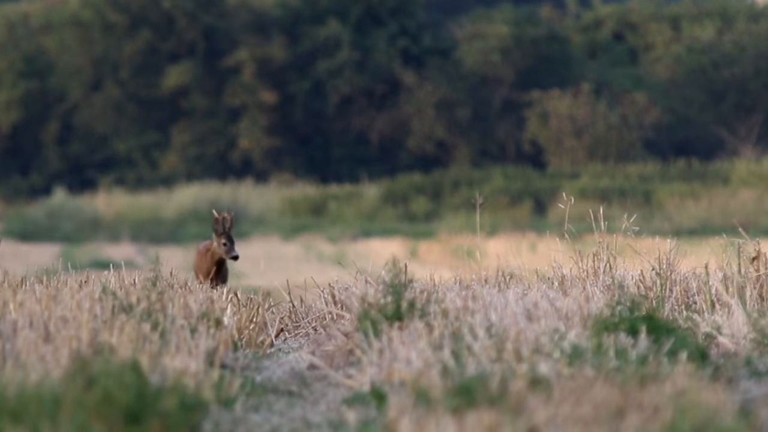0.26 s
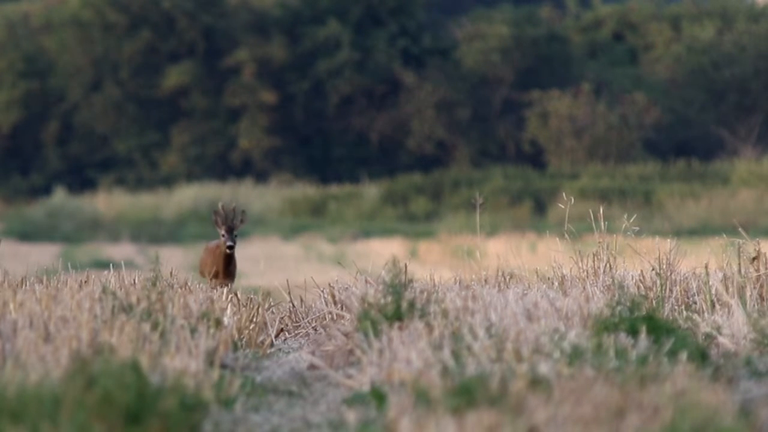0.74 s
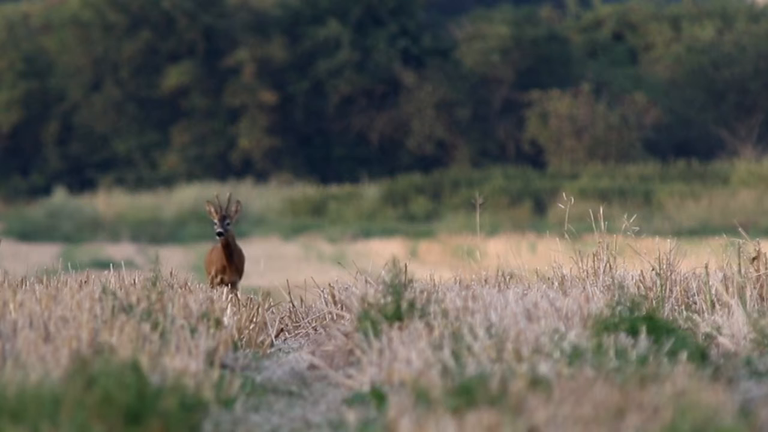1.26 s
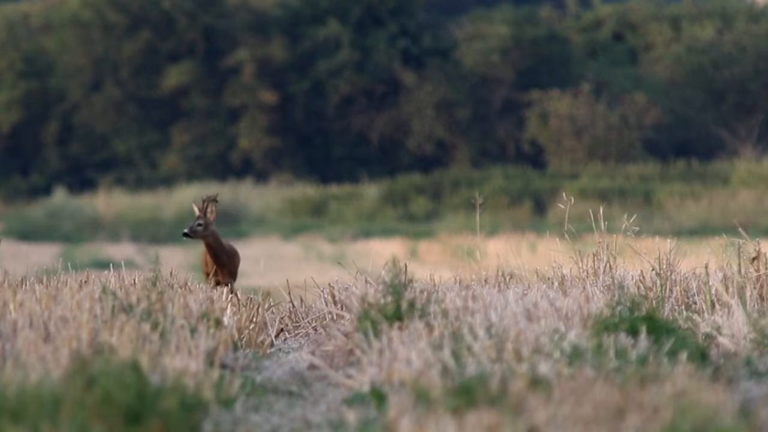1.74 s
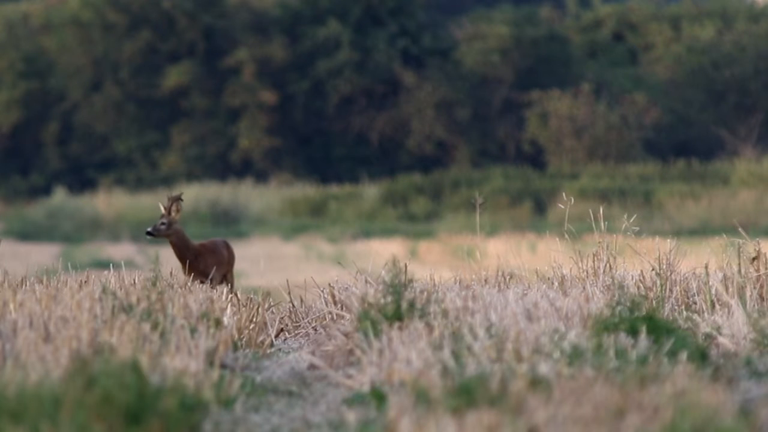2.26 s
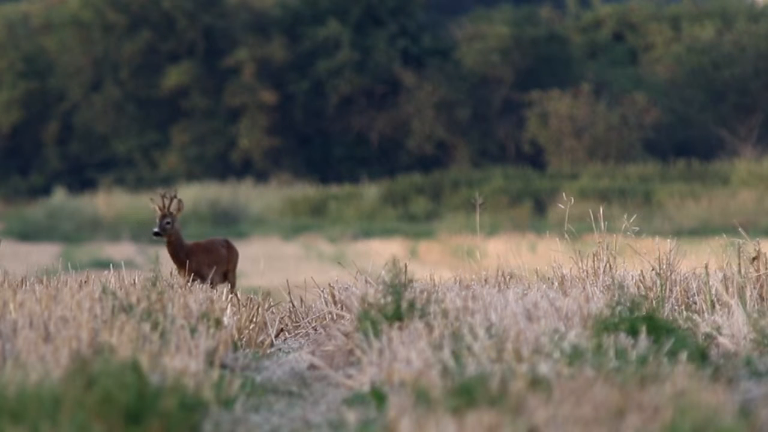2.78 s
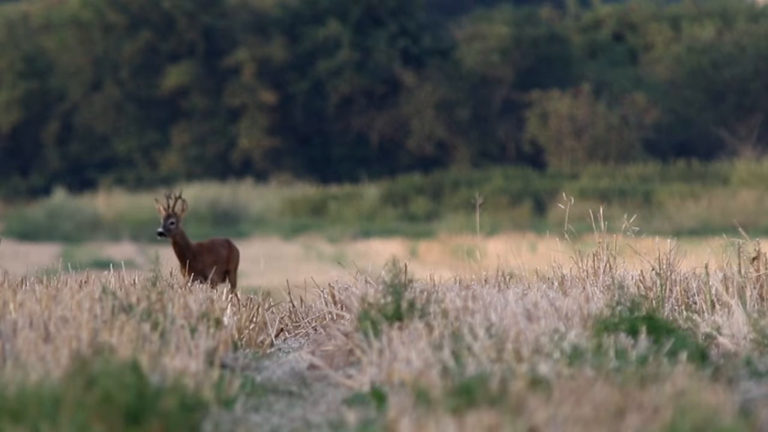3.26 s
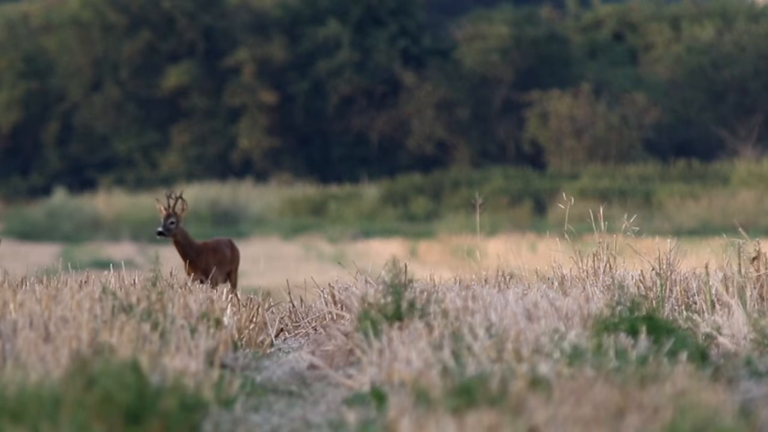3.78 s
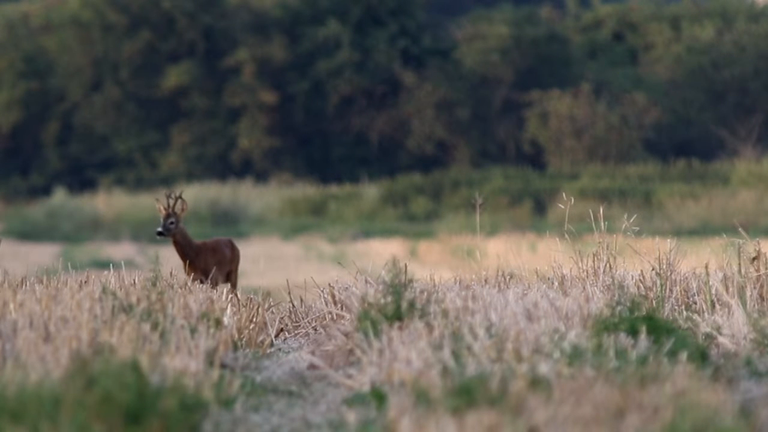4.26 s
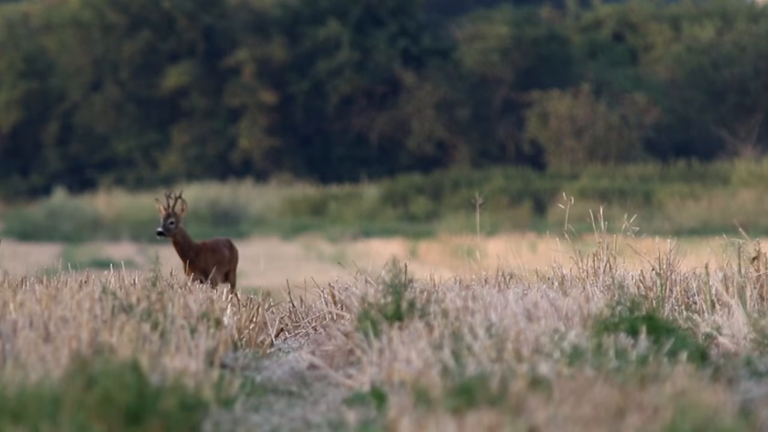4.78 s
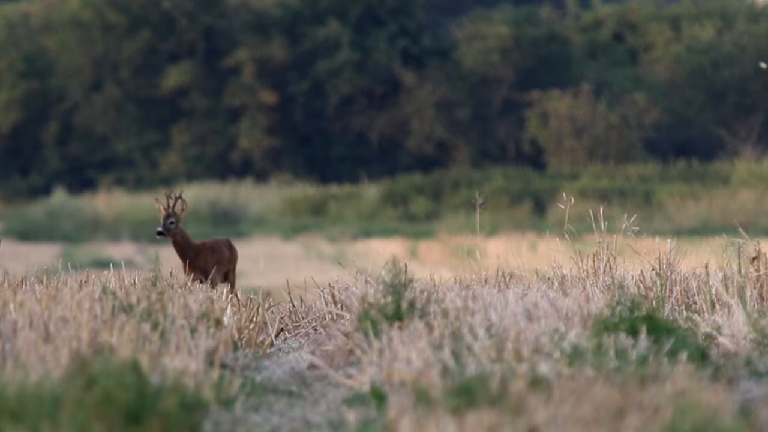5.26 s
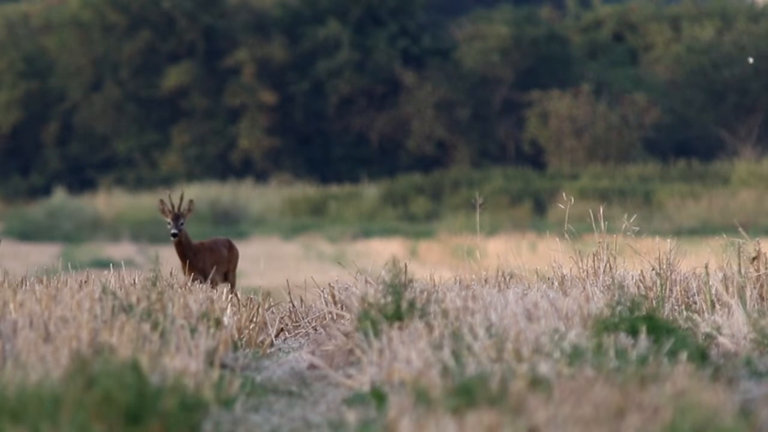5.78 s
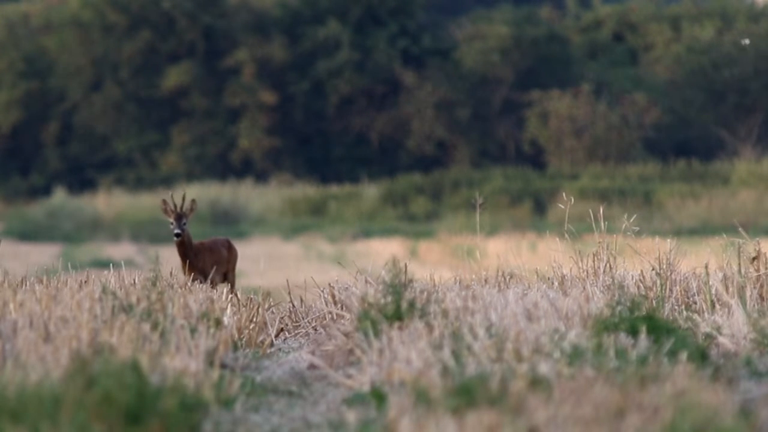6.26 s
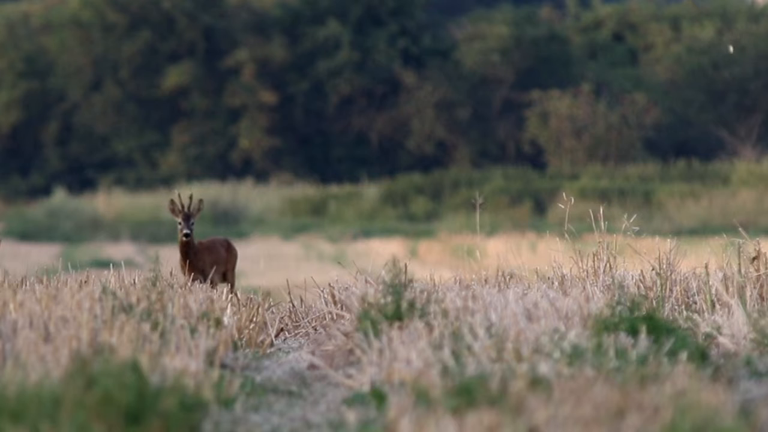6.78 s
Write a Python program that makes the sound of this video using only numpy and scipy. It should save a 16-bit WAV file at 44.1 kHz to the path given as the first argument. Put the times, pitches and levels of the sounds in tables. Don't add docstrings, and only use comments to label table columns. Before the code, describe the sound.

A quiet open field in summer, heard through a camera microphone with low distant hum, airy rustle and light hiss. A tiny handling tick comes at 0.27 s. Faint, dry grasshopper rasps repeat about six times a second, growing slightly until 1.8 s. At 1.84 s a deer gives a single loud, piercing, reedy squeak around 1.5 kHz with bright overtones; it snaps on, rises slightly, sinks and dies by 2.05 s, leaving a short scattered echo from grass and trees. The background drops under automatic gain and creeps back over the next second. From about 2.3 s a faint, low fly buzz wavers in and out, with barely audible lisps and bird notes. Rasping returns from 3.2 to 5.9 s, then again from 6.1 s to the end at 7 s. At 6.6 s a sharp plastic rattle-click knocks the camera body.

```python
import sys
import numpy as np
from scipy import signal
from scipy.fft import rfft, irfft, next_fast_len
from scipy.io import wavfile
from scipy.ndimage import uniform_filter1d, map_coordinates

SR = 44100
rng = np.random.default_rng(int(sys.argv[2]) if len(sys.argv) > 2 else 0)


def int16_out(signal):
    q = np.round(np.clip(np.atleast_2d(signal).T, -1, 1) * 32767)
    wavfile.write(sys.argv[1], SR, q.astype(np.int16))


def makeup_ratio(level_db):
    decades = np.asarray(level_db, float) / 20
    return 10 ** decades


N = 309582


def unit(x):
    return x / np.sqrt(np.mean(x ** 2) + 1e-20)


def along(points, hz):
    f, v = np.transpose(points)
    return np.interp(np.log(hz + 1), np.log(f + 1), v)


def curves(rows, t):
    s, *columns = np.transpose(rows)
    return [np.interp(t, s, column) for column in columns]


def wobble(rate, count=N):
    knots = rng.standard_normal(int(count * rate / SR) + 4)
    return map_coordinates(knots, [np.arange(count) * rate / SR])


def filtered(x, response):
    m = next_fast_len(len(x) + 8192)
    return irfft(rfft(x, m) * response(np.fft.rfftfreq(m, 1 / SR)), m)[:len(x)]


def resonances(modes):
    def response(f):
        total = 0
        for k, (centre, width, db) in enumerate(modes):
            bandpass = 1j * f * width / (centre * centre - f * f + 1j * f * width)
            total = total + (-1) ** k * makeup_ratio(db) * bandpass
        return total
    return response


def add(track, s, piece):
    part = track[max(round(s * SR), 0):][:len(piece)]
    part += piece[:len(part)]


# (frequency [Hz], density [dB per Hz])
AIR_SPECTRUM = [(15, -33), (25, -4), (38, 5), (55, -0.5), (246, -5.5), (632, -4), (896, -7.5), (998, -7),
                (1170, -9.5), (2360, -15.5), (3350, -17.5), (4880, -22.5), (6740, -19.5), (9310, -20),
                (13200, -23.5), (15500, -25.5)]
# (time [s], level [dB])
AIR_DRIFT = [(0, -0.28), (1.5, -0.19), (2.7, 0), (3.3, 0.49), (4.5, 0.23), (5.4, -0.84), (7.02, -0.22)]


def air():
    z = signal.stft(rng.standard_normal(N + 512), nperseg=512)[2]
    patches = uniform_filter1d(rng.standard_normal(z.shape), 5, 0)
    patches = uniform_filter1d(patches, 14, 1)
    noise = signal.istft(z * makeup_ratio(.8 * unit(patches)), nperseg=512)[1][:N]
    drift_db, = curves(AIR_DRIFT, np.arange(N) / SR)

    def colour(f):
        low_cut = f ** 4 / (f ** 4 + 33 ** 4)
        trim_db = 2.5 * np.exp(-((f - 43) / 12) ** 2) - 0.81 * (f > 5500)
        return makeup_ratio(along(AIR_SPECTRUM, f)) * low_cut * makeup_ratio(trim_db) * (f < 15750)

    return makeup_ratio(-54.36 + drift_db) * unit(filtered(noise, colour))


# (time [s], length [s], centre [Hz], width [Hz], level [dB])
PUFFS = [(.995, .05, 11700, 1500, -62), (2.96, .05, 12000, 2000, -62), (6.21, .07, 12200, 1800, -64),
         (2.14, .1, 1850, 120, -60), (2.855, .06, 1800, 150, -64), (3.55, .07, 2050, 300, -63),
         (3.86, .03, 2200, 700, -62), (1.831, .025, 1900, 350, -53), (1.8457, .001, 9000, 7000, -30),
         (1.847, .004, 2050, 350, -24), (1.846, .004, 4100, 400, -31), (6.59, .022, 1900, 800, -54)]


def lisps():
    out = np.zeros(N)
    for s, length, hz, width, db in PUFFS:
        size = round(1.6 * length * SR)
        noise = filtered(rng.standard_normal(8192), lambda f: np.exp(-((f - hz) / width) ** 2))
        add(out, s - 0.7 * length, makeup_ratio(db) * np.hanning(size) * unit(noise[:size]))
    return out


# (time [s], wing beat [Hz], level [dB], facing the microphone [dB])
FLIGHT = [(2.25, 214, -74, -5), (2.42, 210, -63.5, -6), (2.58, 207, -62, -2.5), (2.75, 202.9, -62, -10.5),
          (3, 197, -64, -4), (3.1, 200, -75, -6), (3.17, 214, -60.5, -2.5), (3.36, 206, -67, -1),
          (3.46, 195, -64.5, -6), (3.8, 196, -64, -15), (3.92, 198, -76, -4.5), (4.05, 210, -66.5, -0.5),
          (4.22, 204, -68, -2), (4.4, 202, -89, -2.5), (4.82, 199, -67.5, -2), (5.5, 196, -100, -8),
          (6.4, 196, -64, -12.5), (7.02, 199, -66.5, -23)]
# (multiple, level [dB], share of the facing)
WING_PARTIALS = [(1, -3, 0.077), (2, 0, 0.015), (3, -5.5, .5), (4, -3.5, .7), (5, 0.5, 1), (6, -1, 1),
                 (7, -9.5, 0.8), (9, -12, 0.97)]


def fly():
    hz, level_db, facing_db = curves(FLIGHT, np.arange(N) / SR)
    unsteady = 1 + .012 * wobble(12) + .007 * wobble(60)
    phase = 2 * np.pi * np.cumsum(hz * unsteady) / SR
    loudness = makeup_ratio(level_db + 2.5 + 1.8 * wobble(31))
    return loudness * sum(makeup_ratio(db + share * facing_db) * np.sin(k * phase + k * k)
                          for k, db, share in WING_PARTIALS)


# (end [s], level [dB], loudest slip before the end [s])
BOUT_1 = [(.272, -64.5, .027), (.44, -62.5, .012), (.62, -62, .013), (.795, -60.5, .032), (.968, -57, .012),
          (1.131, -58.5, .035), (1.312, -57, .029), (1.483, -56, .023), (1.626, -57, .009),
          (1.799, -55, .04)]
BOUT_2 = [(3.28, -63.5, .03), (3.493, -64.5, .03), (3.68, -60.5, 0.00844), (3.878, -56, 0.027),
          (4.056, -58, .02), (4.24, -57, .035), (4.411, -56.5, .058), (4.592, -57, 0.032),
          (4.771, -57, .017), (4.95, -57.5, 0.021), (5.138, -56.5, .055), (5.32, -57, .029),
          (5.498, -56.5, .06), (5.674, -57, 0.04), (5.87, -57.5, .038)]
BOUT_3 = [(6.14, -64, .043), (6.304, -61.5, .031), (6.479, -59.5, .056), (6.651, -61, .009),
          (6.831, -58.5, .023), (6.999, -57, .034)]
STROKE_LENGTHS = (.08, .115, 0.087)
# (centre [Hz], width [Hz], level [dB])
WING_EARLY = [(7010, 1500, -1), (9300, 1400, 1), (13050, 3000, -6.5)]
WING_LATE = [(6936, 1600, 1), (8400, 1800, 0.5), (11870, 3500, -9)]


def grasshoppers():
    peg_s, scatter_s = .0105, .003
    loudest_db, slip_db, spread_db, grows_db = 6.5, 3, 5.5, 5
    gate = np.zeros(N)
    slip = np.hanning(round(0.0048 * SR))
    peg = np.arange(-12, 8)
    for length, bout in zip(STROKE_LENGTHS, (BOUT_1, BOUT_2, BOUT_3)):
        swell = np.linspace(0, 1, round(1.1 * length * SR))
        rasp_shape = swell ** 0.71 * np.minimum(8 * (1 - swell), 1)
        for end, db, lead in bout:
            shift, size = rng.standard_normal((2, len(peg)))
            left = lead - peg * peg_s + scatter_s * shift * (peg != 0)
            other_db = slip_db + spread_db * np.minimum(size, 1) - grows_db * left / length
            for s, part_db in zip(left, np.where(peg == 0, loudest_db, other_db)):
                if 0 < s < length:
                    add(gate, end - s - .001, makeup_ratio(db + part_db) * slip)
            add(gate, end - length, makeup_ratio(db - 1.0) * rasp_shape)
    rasp = gate * rng.standard_normal(N)
    parting = 2 * SR

    def radiated(part, wing):
        return filtered(part, lambda f: resonances(wing)(f) * (f / (f + 5000 / 1j)) ** 4)

    early, late = radiated(rasp[:parting], WING_EARLY), radiated(rasp[parting:], WING_LATE)
    return np.r_[makeup_ratio(9) * early, makeup_ratio(10.5) * late]


# (time [s], peak [dB], high modes [dB])
CONTACTS = [
    (.2699, -43, -24),
    (.2728, -44, -24),
    (6.6, -31, -2),
    (6.6012, -30, -4),
    (6.6023, -29.5, -6),
    (6.6035, -27, 11),
    (6.6047, -29, 9),
    (6.6098, -50, 12),
]
# (time [s], peak [dB])
PUSHES = [
    (.27, -36),
    (6.6022, -17),
]
# (centre [Hz], width [Hz], level [dB])
BODY_MODES = [(349, 31, 2.5), (880, 64, 1.5), (1630, 510, 4.5), (2880, 160, -3), (3870, 180, -1),
              (4930, 550, -19)]


def ticks():
    low, middle, high = np.zeros((3, N))
    for s, db, high_db in CONTACTS:
        add(middle, s, makeup_ratio(db + 14) * np.hanning(8))
        add(high, s, makeup_ratio(db + 15 + high_db) * np.hanning(8))
    for s, db in PUSHES:
        add(low, s, makeup_ratio(db + 11.5) * np.hanning(8))
    groups = (low, BODY_MODES[:2]), (middle, BODY_MODES[2:3]), (high, BODY_MODES[3:])
    return sum(filtered(track, resonances(modes)) for track, modes in groups)


# (frequency [Hz], decay by 60 dB [s])
FIELD_DECAY = [(500, .9), (1500, .9), (2800, .3), (4500, .22), (10000, .2)]


def field(x, t60_scale, delay):
    hz, t, z = signal.stft(rng.standard_normal(SR), SR, nperseg=256)
    t60 = t60_scale * along(FIELD_DECAY, hz)[:, None]
    tail = signal.istft(z * makeup_ratio(-60 * t / t60), SR, nperseg=256)[1]
    delayed = np.pad(x, (round(delay * SR), 0))
    return signal.fftconvolve(delayed, tail / np.linalg.norm(tail))[:N]


# (frequency [Hz], level [dB])
SCATTER_RETURN = [(500, 0), (1270, 12), (1520, -3), (2550, 7), (3100, 3), (3650, 12), (4100, 21),
                  (4650, 12), (16000, 0)]


def echoes(call):
    grass = makeup_ratio(-41) * field(call, .17, delay=.006)
    bank = makeup_ratio(-47) * field(call, .35, delay=.04)
    trees = makeup_ratio(-56) * field(call, 1.25, delay=.09)
    return filtered(grass + bank + trees, lambda f: makeup_ratio(along(SCATTER_RETURN, f)))


# (time [s], pitch [Hz], effort [dB])
SQUEAK_COURSE = [
    (1.8443, 1400, -24),
    (1.857, 1466, -25),
    (1.872, 1513, -21.8),
    (1.895, 1543, -21),
    (1.925, 1537, -21.5),
    (1.965, 1494, -22.4),
    (1.99, 1453, -24.5),
    (2.011, 1371, -29.5),
    (2.033, 1240, -32),
]
# (multiple, level [dB])
UPPER_PARTIALS = [(3, 2), (4, 0.5), (5, -4.5), (6, -8.5), (7, -13.5), (8, -25.5), (9, -29), (10, -27),
                  (11, -33.5), (12, -37.5)]
# (delay [s], level [dB])
NEAR_COPIES = [(.0011, -14), (.0027, -18)]
# (frequency [Hz], level [dB])
MOUTH_FIRST = [(1240, 20.5), (1310, 13.5), (1345, 13), (1362, 3), (1385, 17), (1430, 24.5), (1484, 27.8),
               (1545, 30.6)]
MOUTH_SECOND = [(2480, 16), (2620, 24.5), (2720, 27.8), (2840, 24.8), (2920, 23), (2990, 16.5),
                (3090, 17.2)]


def squeak():
    out, start = np.zeros(N), 1.826
    t = start + np.arange(SR // 4) / SR
    hz, effort_db = curves(SQUEAK_COURSE, t)
    since = t - SQUEAK_COURSE[0][0]
    sounding = np.maximum(since, 0)
    flat_hz = uniform_filter1d(165 * np.exp(-sounding / .0022), size=40)
    hz = uniform_filter1d(hz, size=300, mode="nearest") - flat_hz
    phase = 2 * np.pi * np.cumsum(hz) / SR + 0.9
    behind = 1.7 / (1 + np.exp(np.minimum((t - 1.846) / .0003, 50)))
    lag = 1.2 - 0.017 * np.minimum(1540 - hz, 85) + .9 * np.exp(-sounding / .02)
    attack_db_per_s, release_db_per_s = 4600, 2200
    release = makeup_ratio(-release_db_per_s * np.maximum(t - SQUEAK_COURSE[-1][0], 0))
    level = makeup_ratio(effort_db) * release

    def swell(late_s, steep):
        return level * makeup_ratio(steep * attack_db_per_s * np.minimum(since - late_s, 0))

    def mouth(points, multiple):
        return uniform_filter1d(makeup_ratio(along(points, multiple * hz)), round(.003 * SR))

    bare = np.exp(-(sounding / .009) ** 2)
    first = swell(.0003, 0.97) * (bare * makeup_ratio(22) + (1 - bare) * mouth(MOUTH_FIRST, 1))
    second = swell(.0019, 1.4) * mouth(MOUTH_SECOND, 2.017)
    upper = sum(makeup_ratio(db + 1.2 * wobble(60, count=len(t))) * np.cos(k * phase + k * lag / 2)
                for k, db in UPPER_PARTIALS)
    upper = upper * swell(.0006, 2.3) * release

    def near_path(f):
        ripple = 1 + sum(makeup_ratio(db) * np.exp(-2j * np.pi * f * s) for s, db in NEAR_COPIES)
        capsule = 1 + 4.2 * np.exp(-((f - 15300) / 600) ** 2)
        return ripple * capsule

    upper = filtered(upper, near_path)
    leak = filtered(rng.standard_normal(len(t)), lambda f: np.exp(-((f - 2100) / 500) ** 2))
    leak = makeup_ratio(-50.5) * unit(leak)
    add(out, start, upper + first * (leak + np.cos(phase - behind)) + second * np.cos(2 * phase + lag))
    return out


def scene():
    call = squeak()
    return (air() + lisps() + fly() + grasshoppers() + ticks() + echoes(call) + call)[None]


LATE_CUTS = [1.853, 1.857, 1.861, 1.866, 1.869, 1.873, 1.8795, 1.8945]


def gain_control(x):
    t = np.arange(N) / SR
    cuts = np.r_[np.linspace(1.8445, 1.850, num=15), LATE_CUTS]
    count = np.arange(len(cuts))
    rises = 1.9705 + .021 * count + .00024 * count ** 2
    steps = np.searchsorted(rises, t) - np.searchsorted(cuts, t)
    return x * makeup_ratio(.75 * uniform_filter1d(steps * 1.0, size=6))


def low_pass(x):
    return signal.sosfilt(signal.butter(12, 15680, fs=SR, output="sos"), x)


def record(dry):
    x = gain_control(filtered(dry[0], lambda f: f < 15750)[None])
    hiss = filtered(rng.standard_normal(N), lambda f: f / (f + 2500 / 1j) * (f < 15750))
    x = x + makeup_ratio(-77.5) * hiss
    x = x / (1 + np.abs(x / 1.02) ** 8) ** (1 / 8)
    return low_pass(x)


dry = scene()
out = record(dry)
int16_out(out)
```